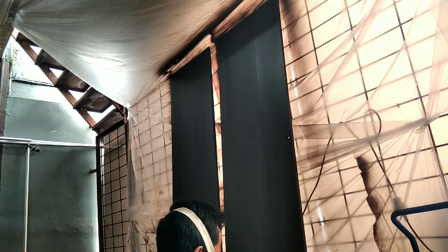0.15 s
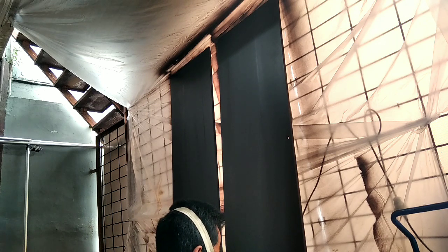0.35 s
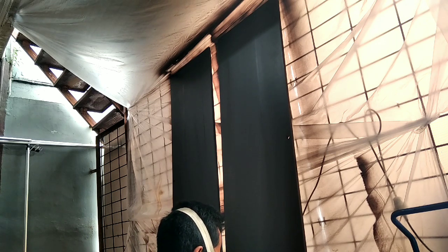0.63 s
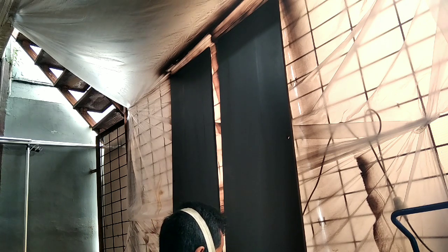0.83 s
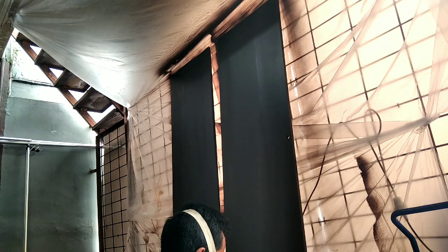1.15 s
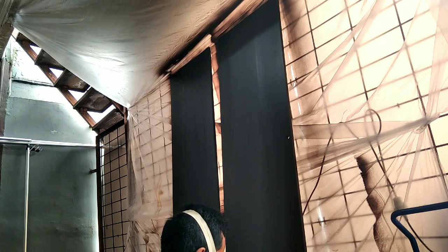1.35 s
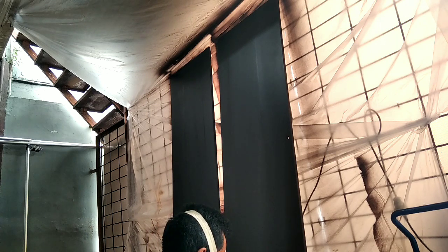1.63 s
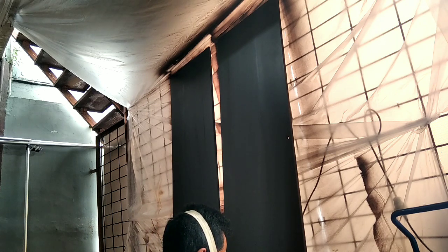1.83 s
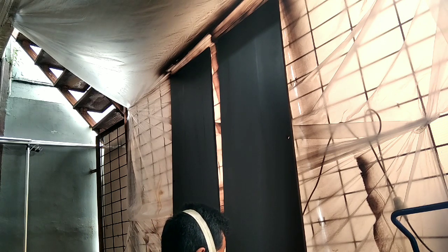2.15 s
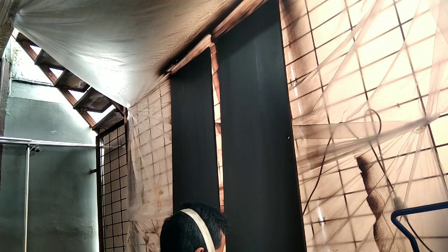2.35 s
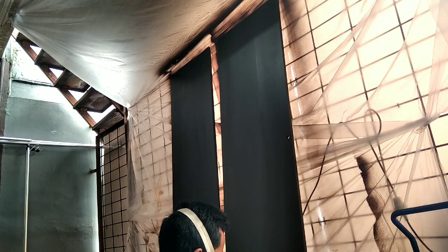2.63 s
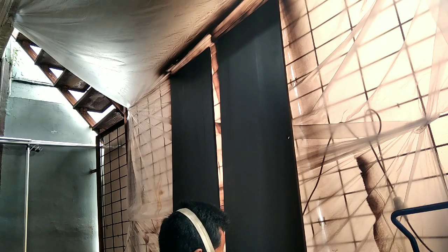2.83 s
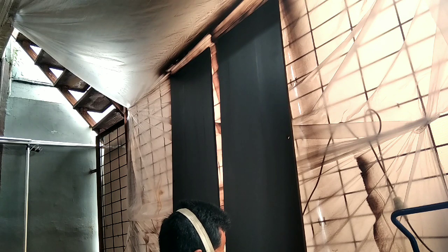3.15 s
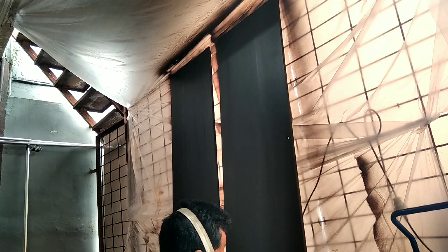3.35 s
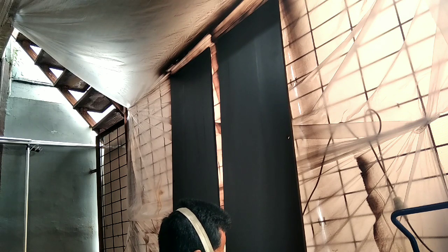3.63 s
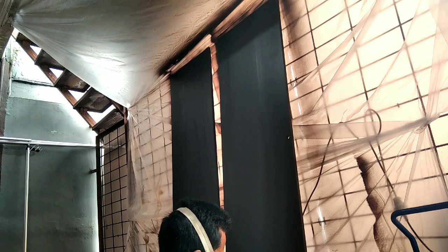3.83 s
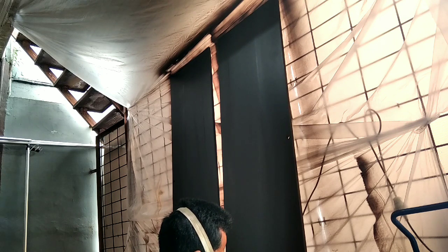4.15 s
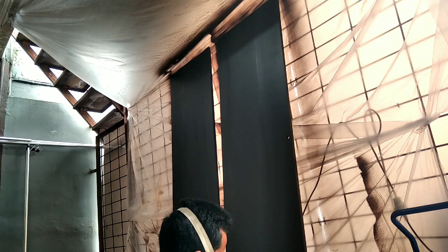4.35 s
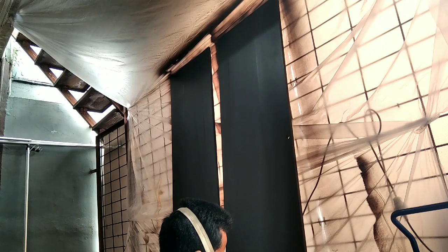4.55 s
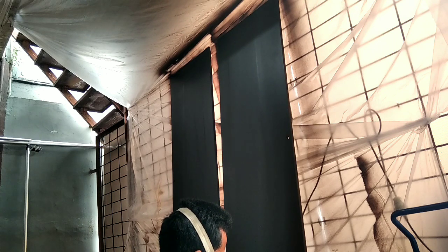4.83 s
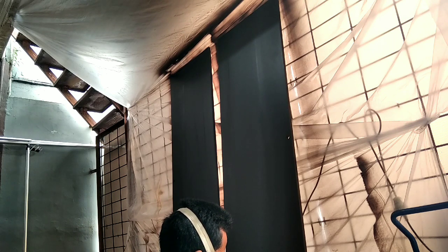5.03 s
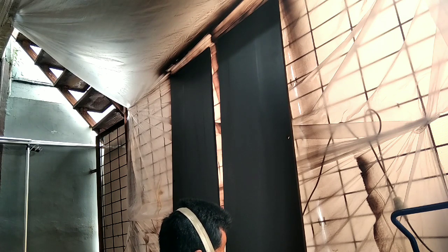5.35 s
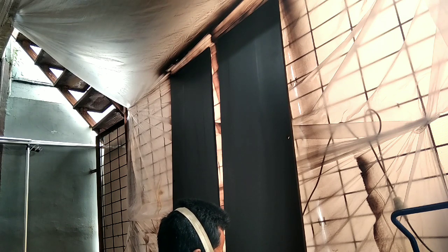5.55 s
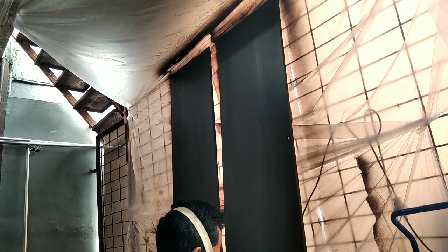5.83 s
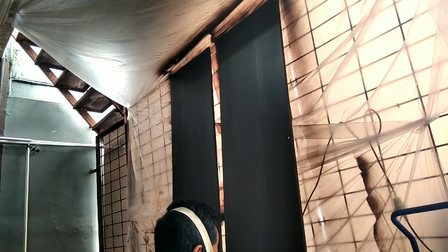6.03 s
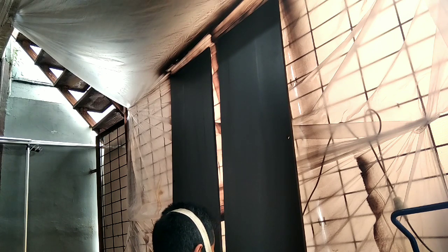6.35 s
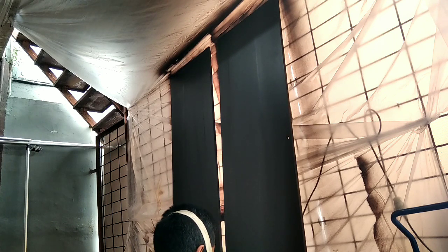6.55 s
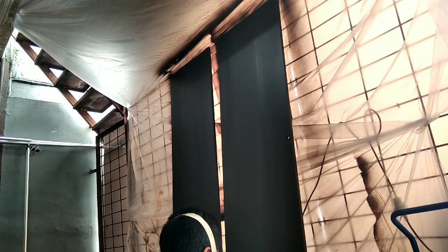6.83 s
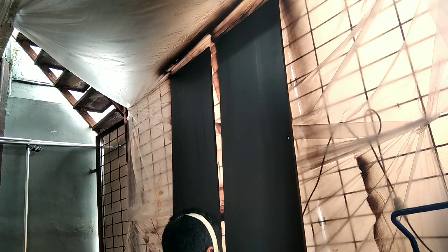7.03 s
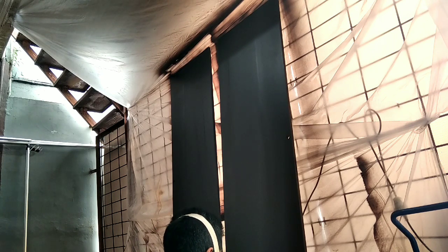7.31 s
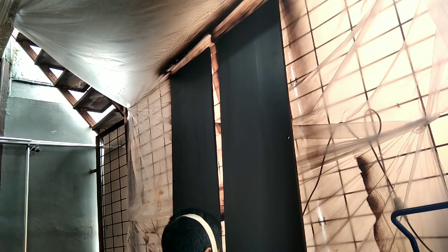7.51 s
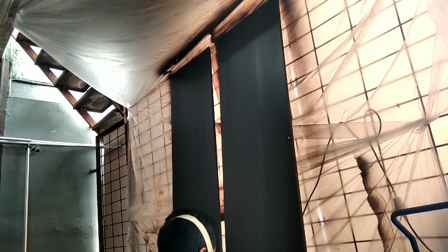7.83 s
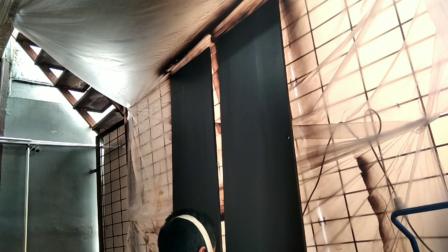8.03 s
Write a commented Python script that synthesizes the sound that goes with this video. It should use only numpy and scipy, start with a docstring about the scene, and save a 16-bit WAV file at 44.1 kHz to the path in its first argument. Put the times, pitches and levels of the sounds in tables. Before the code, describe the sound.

Steady mechanical roar of a belt-driven compressor: rapid piston strokes, motor hum, a ringing belt guard and clattering pump head, over faint low room rumble. Occasional knocks and hollow tank booms break the evenness, while a leak hisses continuously. Late on, a valve thumps and a bright jet of spray bursts over the machine. Stationary stereo microphone in a small, reflective tiled room.

```python
"""Air compressor and spray gun

A belt-driven piston compressor runs steadily in a tiled workshop. Pure tones make its pump drone and motor hum.
Noise pulsed by the piston strokes makes the chuffing and the clatter of the pump's head.
Listed moments set off knocks on the casing, jolts of the guard, booms of the tank and spits from a leak.
Near the end a spray gun opens with a thump and a sharp, high hiss of shaped noise."""
import sys
import numpy as np
from scipy.fft import rfft, irfft, next_fast_len
from scipy.io import wavfile
from scipy.ndimage import map_coordinates

SR = 44100
rng = np.random.default_rng(int(sys.argv[2]) if len(sys.argv) > 2 else 0)


def unload_wav(signal):
    """Save mono or channel-first audio to the path in sys.argv[1] as 16-bit WAV at rate SR, clipped to [-1, 1]."""
    wavfile.write(
        sys.argv[1],
        SR,
        np.round(np.clip(np.atleast_2d(signal).T, -1, 1) * 32767).astype(np.int16),
    )


N = 360738  # length in samples
TIME = np.arange(N) / SR  # s

PUMP_HZ, MOTOR_HZ = 23.685, 58.08  # mean turns per second of the crank and the motor shaft
BELT_HZ = 2.275  # laps of the belt per second


# Tones of the pump: multiple of the crank rate, level/dB, left minus right/dB
PUMP_TONES = [(1, -73, -1), (2, -56, 1.5), (3, -73, -3), (4, -62.5, 0), (5, -68, 6), (6, -65, 1),
              (7, -61, 1), (8, -58.5, 2.5), (9, -60.5, 2), (10, -63, 0), (11, -61.5, 0), (14, -51.5, 5),
              (15, -48, 1), (17, -64, -5), (18, -61, -9), (19, -55, -10), (21, -61.5, 11), (22, -55, -1),
              (23, -61.5, -4), (24, -52, -5), (27, -63, 2), (28, -50.5, 0), (29, -41, -1.5), (30, -53, -7),
              (31, -51.5, -7), (32, -60, -1), (34, -52, 3), (35, -56.5, 5), (36, -55, 9), (38, -53, -14),
              (39, -51.5, -1), (45, -58, -3)]
STROKE_PLACE, STROKE_SMEAR = .62, 1.1  # main stroke (turns); random spread of the tones around it (radians)
DRONE_FLUTTER = 0.09  # how much each tone trembles in strength and phase
DRONE_GROWS_DB_PER_S, DRONE_MIDDLE_S = 0.16, 4  # growth; moment when the listed levels hold


def pump_drone(crank):
    """The tank radiates multiples of the crank rate, loosely bunched at the main stroke, growing as it fills."""
    drone = 0
    for multiple, db, side_db in PUMP_TONES:
        smear = STROKE_SMEAR * rng.standard_normal() / (2 * np.pi)
        tremble = 1 + DRONE_FLUTTER * (wobble(9) + 1j * wobble(13))
        turns = round(multiple) * (crank - STROKE_PLACE) + smear
        drone = drone + amp(db) * pan(side_db) * tone(turns, multiple * PUMP_HZ, tremble)
    return drone * amp(DRONE_GROWS_DB_PER_S * (TIME - DRONE_MIDDLE_S))


# Tones of the motor: multiple of its shaft rate, level/dB
MOTOR_TONES = [(6, -52), (12, -56.5)]


def motor_hum(crank):
    """The motor hums at multiples of its shaft rate, which beat against the pump's tones."""
    shaft = crank * MOTOR_HZ / PUMP_HZ
    return sum(amp(db) * tone(round(multiple) * shaft + rng.random(), multiple * MOTOR_HZ)
               for multiple, db in MOTOR_TONES)


# Bursts of air in one crank turn: place/turns, width/turns, strength
VALVE_BURSTS = [(.23, .08, 1.0), (.5, .06, .7), (.71, .07, 1.3)]


def valve_flow(crank):
    """Air passes the valves in a few bursts per crank turn, on top of a steady flow of 1."""
    flow = 1
    for place, width, strength in VALVE_BURSTS:
        # a smooth bump that repeats every turn
        nearness = np.cos(2 * np.pi * (crank - place)) - 1
        flow = flow + strength * np.exp(nearness / (2 * np.pi * width) ** 2)
    return flow


# Relative spectrum of the pump casing: f/Hz, level/dB per Hz
CASING_SPECTRUM = [(200, -34), (260, -16), (350, -14.5), (430, -9), (520, -5.5), (610, -2), (720, -0.5),
                   (870, 1.5), (930, 1.5), (1060, -1), (1130, -9), (1210, -14), (1300, -26), (3000, -50)]


def casing_chuff(force):
    """The rushing air of each stroke shakes the casing: pulsed noise with a broad spectrum."""
    return amp(-34.5) * coloured(turbulence() * force, CASING_SPECTRUM)


# Resonances of the tank shell: f/Hz, width/Hz, relative level/dB
TANK_MODES = [(242.5, 2.2, -4), (268, 2.1, -4.5), (300.3, 1.77, -1.5), (315, 1.7, -4), (372.4, 2.5, -3),
              (398.3, 4.8, -7), (417.7, 2.2, -4.5), (608.4, 7.3, -2), (628, 4.8, -1.5), (659, 3.2, 2),
              (738, 10, 0), (831.6, 7.9, 2), (876, 36, -2), (916, 4.9, 4), (931, 6.2, -4.5),
              (1189, 11, -7.5)]


def tank_chuff(force, pull):
    """The same strokes make the tank shell ring, a little louder when the belt pulls hard."""
    return amp(-39.0 + 0.6 * pull) * ringing(turbulence() * force, TANK_MODES)


# Resonances of the belt guard: f/Hz, width/Hz
GUARD_MODES = [(968, 13.98), (1029, 19.76)]
# Jolts of the belt: t/s, lower resonance level/dB, upper resonance level/dB (before the swell's shape)
BELT_JOLTS = [(.09, -32, -35), (.35, -31, -33), (.61, -32, -31), (.75, -48, -32), (.99, -39, -41),
              (1.41, -29, -34), (1.68, -35, -33), (1.83, -38, -37), (2.30, -31, -47), (2.48, -29, -37),
              (2.72, -30, -45), (2.81, -31, -41), (3.17, -35, -30.5), (3.47, -36, -38), (3.68, -29, -41),
              (3.78, -34, -33), (3.85, -33, -48), (4.25, -35, -50), (4.5, -29.5, -35), (4.92, -31.5, -37),
              (5.00, -32, -44), (5.09, -46, -35), (5.36, -30, -39), (5.81, -28, -37), (5.89, -29, -45),
              (6.24, -30.5, -36), (6.40, -31, -38), (6.70, -28.5, -36), (6.82, -28, -32),
              (7.12, -29.5, -42), (7.37, -33, -36), (8.09, -37, -41)]
JOLT_RISE_S, JOLT_DECAY_S = 0.02, 0.059
GUARD_REST_DB, GUARD_SCATTER_DB = -48, 0.6  # level between jolts; how far the level wavers
GUARD_THROB = 0.48  # power of the flow that pulses the guard


def guard_rattle(flow):
    """The metal guard sings after each jolt; its two resonances drift in phase and throb with the strokes."""
    times, *levels = np.transpose(BELT_JOLTS)
    guard = 0
    for (hz, width), jolt_db in zip(GUARD_MODES, levels):
        jolt_power = swells(times, jolt_db, JOLT_RISE_S, JOLT_DECAY_S)
        swell = np.sqrt(amp(GUARD_REST_DB) ** 2 + jolt_power)
        turns = np.cumsum(hz + 0.553 * width * wobble(30)) / SR
        ring = tone(turns, hz, 1 + 0.36 * (wobble(15) + 1j * wobble(13)))
        throbbing = unit(ring * flow ** GUARD_THROB)
        guard = guard + amp(GUARD_SCATTER_DB * wobble(9.8)) * swell * throbbing
    return guard


# Resonances of the cylinder head: f/Hz, width/Hz, relative level/dB
HEAD_MODES = [(1564, 48, -1.5), (1636, 14.7, 4.5), (1724, 78, 0.5), (1757, 62, -1), (2430, 150, -12.5)]
HEAD_DB, HEAD_SCATTER_DB, HEAD_EASE_DB_PER_S = -41, 0.8, 0.11  # starting level, unsteadiness, slow easing
HEAD_THROB = 0.49  # power of the flow that pulses the head


def head_clatter(flow):
    """Noise pulsed by the strokes rings the cylinder head, easing slowly."""
    level_db = HEAD_DB - HEAD_EASE_DB_PER_S * TIME + HEAD_SCATTER_DB * wobble(9)
    return amp(level_db) * ringing(turbulence() * flow ** HEAD_THROB, HEAD_MODES)


# Hard knocks of the pump casing: t/s of the peak, level/dB
CASING_KNOCKS = [(1.024, -22), (1.447, -22), (1.721, -23), (2.004, -22), (3.186, -25), (3.493, -20),
                 (4.209, -23), (4.802, -22), (4.949, -27), (6.111, -25), (6.346, -22), (7.146, -22),
                 (8.128, -24)]
# What each knock rings with: f/Hz, relative level/dB
KNOCK_TONES = [(690, -7.5), (835, -13.5), (965, -7), (1640, -23)]
KNOCK_LEAD_S, KNOCK_DECAY_S = 0.0033, 0.0047  # build-up to the peak, and decay


def casing_knocks():
    """Hard knocks sound on the pump casing at listed moments, each a few tones that die at once."""
    return sum(knock(s, db, KNOCK_TONES, KNOCK_LEAD_S, KNOCK_DECAY_S) for s, db in CASING_KNOCKS)


# Booms of the tank: t/s, level/dB before the swell's shape
TANK_BOOMS = [(.3, -34), (2.64, -34), (3.44, -33), (4.79, -31), (6.09, -33)]
BOOM_HZ, BOOM_SIDE_DB, BOOM_RISE_S, BOOM_DECAY_S = 607, 7, 0.045, 0.085  # side: left minus right


def tank_booms():
    """Now and then one resonance of the tank swells up and rings out, its pitch wavering slightly."""
    swell = np.sqrt(swells(*np.transpose(TANK_BOOMS), BOOM_RISE_S, BOOM_DECAY_S))
    turns = np.cumsum(BOOM_HZ + 2.5 * wobble(8)) / SR
    return swell * pan(BOOM_SIDE_DB) * tone(turns, BOOM_HZ)


# Relative spectrum of the spray jet: f/Hz, level/dB per Hz
JET_SPECTRUM = [(1500, -17), (2800, -27), (3300, -9.5), (4600, -6.5), (5400, -8), (6500, -4), (7800, -1.5),
                (9200, 5.5), (10300, 4), (11500, 1), (13000, 0.5), (14300, -2.5)]
# Course of the spray: t/s, level/dB, left minus right/dB
SPRAY_COURSE = [(7.44, -68, 0), (7.457, -37, 1), (7.464, -26.5, 1), (7.56, -26.3, 1), (7.7, -27.5, 1.5),
                (7.85, -27.5, 1.5), (7.99, -28, 2), (8.08, -30, 2.5), (8.18, -31.5, 1.5)]


def spray_jet():
    """The jet bursts open as a high hiss, blows evenly and eases as the gun sweeps away."""
    jet_db, side_db = curves(SPRAY_COURSE)
    return amp(jet_db + 0.5 * wobble(50)) * pan(side_db) * coloured(turbulence(), JET_SPECTRUM)


# Thump of the gun's valve: t/s of the peak, level/dB
TRIGGER_THUMP = (7.446, -31)
# What the valve rings with: f/Hz, relative level/dB
TRIGGER_TONES = [(1240, -6), (2120, -20)]
TRIGGER_LEAD_S, TRIGGER_DECAY_S = 0.0063, 0.0073  # build-up to the peak, and decay


def trigger_thump():
    """The gun's valve gives one short thump just before the full blast of air."""
    return knock(*TRIGGER_THUMP, TRIGGER_TONES, TRIGGER_LEAD_S, TRIGGER_DECAY_S)


# Relative spectrum of the leaking air: f/Hz, level/dB per Hz
LEAK_SPECTRUM = [(600, -9.5), (1300, 2), (2000, 4.5), (2500, 0.5), (2850, -4), (3080, 1.5), (4400, -1.45),
                 (4900, -0.9), (5400, -4), (6200, -1.5), (7200, -4), (7700, 0), (8600, -1.5), (9550, 1.5),
                 (9950, -3), (10400, -3.5), (10750, -5), (11750, -9), (12250, -5.5), (12850, -8.5),
                 (13200, -10.5), (14300, -19)]
# The leak lies to the left: f/Hz, left minus right/dB
LEAK_BALANCE = [(1500, 1.5), (3200, 3), (4800, 0.5), (7500, 2), (9700, 5.5), (13000, 3.5)]
# Harder spits of the leak: t/s, level/dB before the swell's shape
LEAK_SPITS = [(.17, -40), (.43, -41), (.51, -44), (.95, -39), (1.29, -41.5), (1.55, -43), (1.73, -42),
              (2.07, -46), (2.67, -41), (3.25, -42), (3.68, -41), (4.47, -44), (5.92, -39), (6.15, -43),
              (7.19, -40)]
# Relative spectrum of a spit: f/Hz, level/dB per Hz
SPIT_SPECTRUM = [(1500, -11), (3500, -9), (6000, -3), (8000, 6.5), (9600, 3), (11500, -7), (12500, -3),
                 (14300, -20)]
LEAK_DB, LEAK_SWELL_DB = -38.5, 0.34  # steady level; how far it follows the belt's pull
SPIT_RISE_S, SPIT_DECAY_S = 0.0044, 0.084


def leak(pull):
    """Escaping air hisses steadily, swells a little with each lap of the belt and spits now and then."""
    def hiss():
        return filtered(turbulence(), lambda hz: pan(along(LEAK_BALANCE, hz)))

    steady_db = LEAK_DB + LEAK_SWELL_DB * pull + 0.16 * wobble(11)
    steady = amp(steady_db) * coloured(hiss(), LEAK_SPECTRUM)
    spit_swell = np.sqrt(swells(*np.transpose(LEAK_SPITS), SPIT_RISE_S, SPIT_DECAY_S))
    spits = spit_swell * coloured(hiss(), SPIT_SPECTRUM)
    return (steady + spits) * amp(0.63 * wobble(40))


# Relative spectrum of the room rumble: f/Hz, level/dB per Hz
RUMBLE_SPECTRUM = [(15, -20), (40, 1), (65, -3), (100, 5), (130, 0.5), (200, 0.5), (300, -4.5), (600, -3),
                   (3000, -80)]
# Course of the rumble: t/s, level/dB
RUMBLE_COURSE = [(0, -52), (1.2, -52.5), (1.8, -55), (2.9, -52), (3.8, -56), (5.8, -56), (7.2, -57),
                 (7.6, -52)]


def room_rumble():
    """Low noise fills the room and slowly changes in level."""
    return amp(curves(RUMBLE_COURSE)[0]) * coloured(turbulence(), RUMBLE_SPECTRUM)


# Pitches that standing waves cancel: f/Hz, width/Hz, depth/dB
ROOM_NULLS = [(439, 11, -10), (596, 4.2, -6), (642, 4, -5), (666, 3.5, -4), (721, 4.4, -1), (912, 5, -11),
              (945, 6.4, -4.5), (1072, 7.7, -9), (1155, 14, -7)]
# Pitches that standing waves tip to one ear: f/Hz, left minus right/dB
ROOM_BALANCE = [(390, -0.5), (430, -2), (505, 3), (560, 2), (610, 6), (645, 4), (680, -1), (775, -1.5),
                (810, 1.5), (880, 5), (905, -7.5), (955, 3.5), (985, -3), (1110, -3), (1175, 3), (1380, -4),
                (1480, 1)]


def standing_waves(x):
    """Standing waves in the tiled room hollow out narrow bands and tip others to one side."""
    def response(f):
        dips_db = sum(db * np.exp(-((f - hz) / width) ** 2) for hz, width, db in ROOM_NULLS)
        return pan(along(ROOM_BALANCE, f)) * amp(dips_db)

    return filtered(x, response)


# Likeness of noise at the two ears: f/Hz, likeness (1 = same, 0 = unrelated)
EAR_LIKENESS = [(50, .99), (250, .88), (450, .62), (630, .3), (780, .55), (900, .35), (1000, .72),
                (1280, .25), (1600, .68), (2000, .2), (5000, 0), (12000, -.08)]


def turbulence():
    """White stereo noise; the room makes the treble differ between the ears."""
    def shares(hz):
        angle = np.arccos(np.clip(along(EAR_LIKENESS, hz), -1, 1)) / 2
        return np.array([np.cos(angle), np.sin(angle)])

    mid, side = filtered(rng.standard_normal((2, N)), shares)
    return filtered(np.array([mid + side, mid - side]), ears)


# Phase by which the left ear leads: f/Hz, lead/radians
EAR_LEAD = [(300, 0), (650, .65), (1000, .8), (1250, 0), (1450, 3.1), (3000, 3.6), (6000, 6.3)]


def ears(hz):
    """Phase shifts of the left and right ear, half the lead each."""
    return np.exp(np.multiply.outer([.5j, -.5j], np.atleast_1d(along(EAR_LEAD, hz))))


def belt_pull(laps):
    """The uneven belt tightens and slackens once a lap, from -1 to 1."""
    return np.cos(2 * np.pi * (laps - 0.15))  # hardest pull at 0.15 of a lap


def swells(times, levels_db, rise_s, decay_s):
    """Summed power of swells that rise quickly and die away."""
    power, age = np.zeros(N + SR), np.arange(SR // 2) / SR
    shape = (1 - np.exp(-age / rise_s)) * np.exp(-age / decay_s)
    for s, db in zip(times, levels_db):
        power[round(s * SR):][:len(age)] += (amp(db) * shape) ** 2
    return power[:N]


def knock(s, db, modes, lead_s, decay_s):
    """One short, dull blow on metal: tones that build up straight, then die away."""
    age = np.arange(SR // 20) / SR - lead_s  # zero at the peak
    ring = sum(amp(level) * np.real(np.exp(2j * np.pi * hz * age) * ears(hz)) for hz, level in modes)
    shape = np.minimum(1 + age / lead_s, np.exp(-age / decay_s))
    out = np.zeros((2, N + SR))
    out[:, round((s - lead_s) * SR):][:, :len(age)] = amp(db) * ring * shape
    return out[:, :N]


def tone(turns, hz, sway=1):
    """A tone of rms 1 over both ears; sway varies its strength and phase."""
    return unit(np.real(sway * np.exp(2j * np.pi * turns) * ears(hz)))


def coloured(x, spectrum):
    """Pass x through a broad spectrum, at rms 1."""
    return unit(filtered(x, lambda hz: amp(along(spectrum, hz))))


def ringing(x, modes):
    """Pass x through a set of resonances with alternating signs, at rms 1."""
    def response(f):
        total = 0
        for k, (centre, width, db) in enumerate(modes):
            damping = 1j * f * width
            total = total + (-1) ** k * amp(db) * damping / (centre * centre - f * f + damping)
        return total

    return unit(filtered(x, response))


def filtered(x, response):
    """Multiply the spectrum of x by a response that depends on frequency."""
    m = next_fast_len(N + SR // 2)
    return irfft(rfft(x, m) * response(np.fft.rfftfreq(m, 1 / SR)), m)[..., :N]


def wobble(rate):
    """A smooth random curve through a given number of random points a second."""
    return map_coordinates(rng.standard_normal(int(N * rate / SR) + 4), [np.arange(N) * rate / SR])


def curves(rows):
    """One value per sample for each column after the time."""
    s, *cols = np.transpose(rows)
    return [np.interp(TIME, s, c) for c in cols]


def along(points, hz):
    """Read a curve of (frequency, value) points on a log frequency axis."""
    f, v = np.transpose(points)
    return np.interp(np.log(hz + 1), np.log(f + 1), v)


def pan(db):
    """Left and right gains for a level difference."""
    return amp(np.multiply.outer([.5, -.5], np.atleast_1d(db)))


def amp(db):
    """Turn decibels into gain."""
    return 10 ** (np.asarray(db) / 20)


def unit(x):
    """Scale to rms 1."""
    return x / np.sqrt(np.mean(x ** 2) + 1e-20)


def scene():
    """The crank, nearly constant in speed, drives the strokes; the slower belt's pull sways tank and leak."""
    crank = np.cumsum(PUMP_HZ * (1 + 0.00063 * wobble(1.0) + .0012 * wobble(12))) / SR  # turns
    flow = valve_flow(crank)
    pull = belt_pull(BELT_HZ * TIME)
    force = flow * amp(0.5 * wobble(24))  # uneven force of the strokes
    chuff = casing_chuff(force) + tank_chuff(force, pull)
    clatter = standing_waves(chuff + guard_rattle(flow) + head_clatter(flow))
    compressor = pump_drone(crank) + motor_hum(crank) + clatter + casing_knocks() + tank_booms()
    return compressor + spray_jet() + trigger_thump() + leak(pull) + room_rumble()


def record(dry):
    """Keep only what lies below 14300 Hz."""
    return filtered(dry, lambda hz: hz < 14300)


dry = scene()
out = record(dry)
unload_wav(out)
```